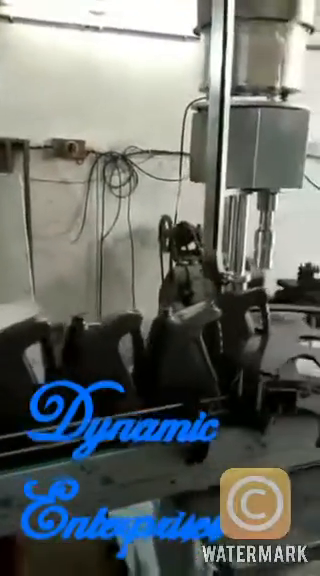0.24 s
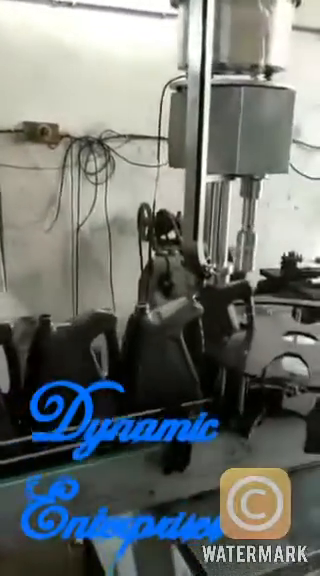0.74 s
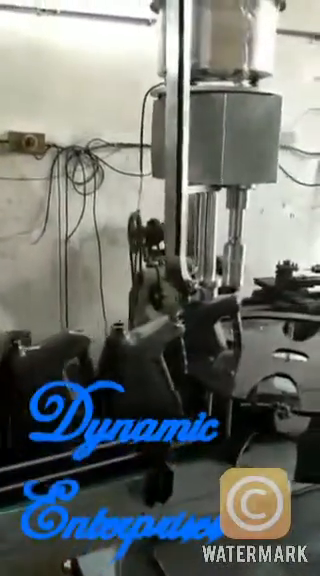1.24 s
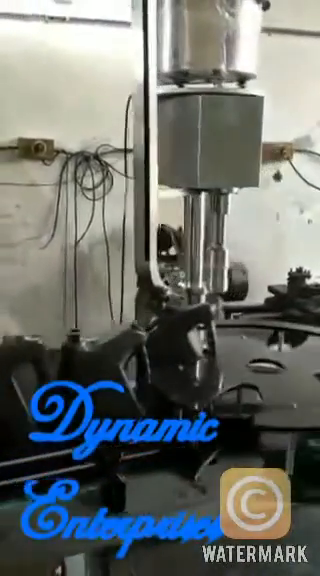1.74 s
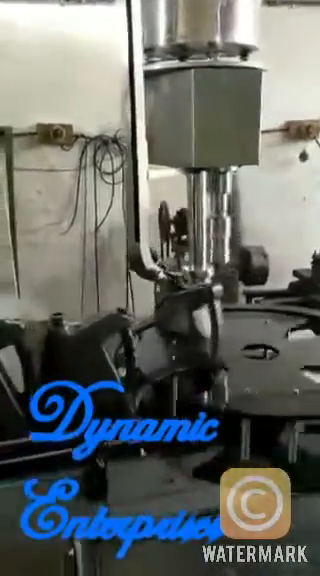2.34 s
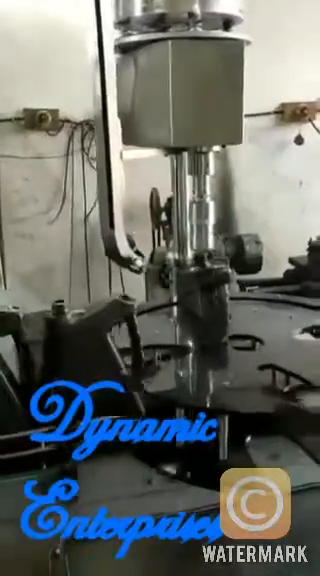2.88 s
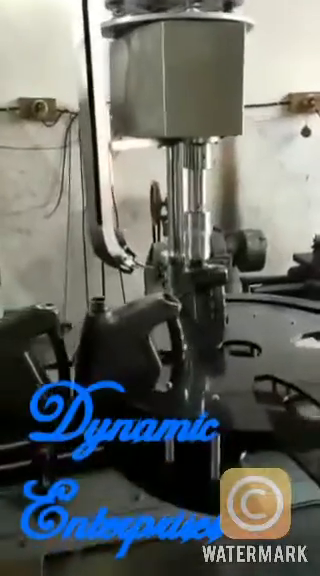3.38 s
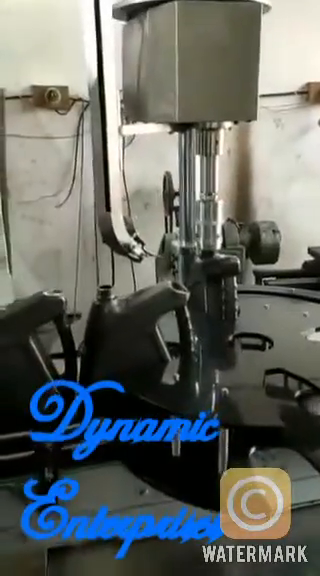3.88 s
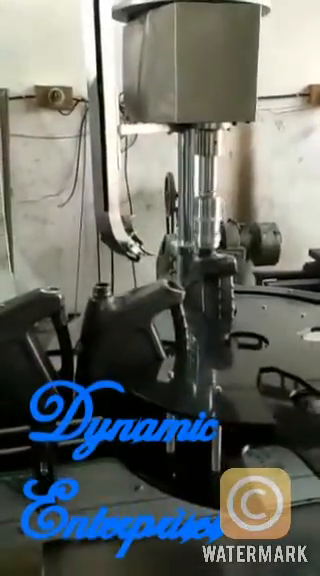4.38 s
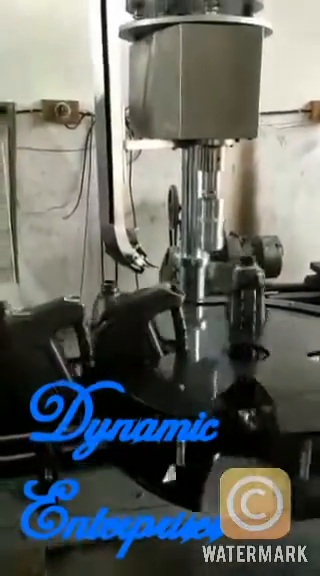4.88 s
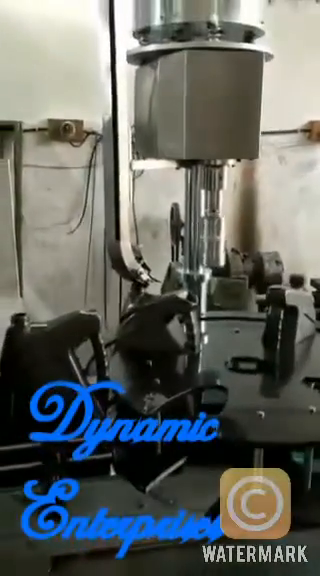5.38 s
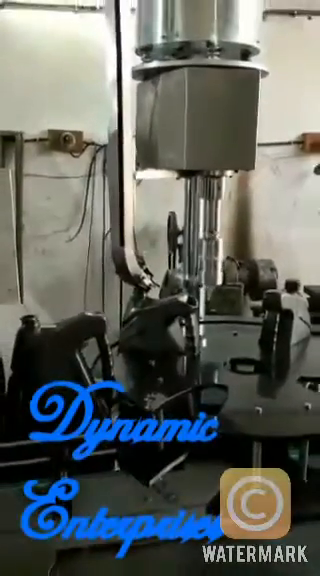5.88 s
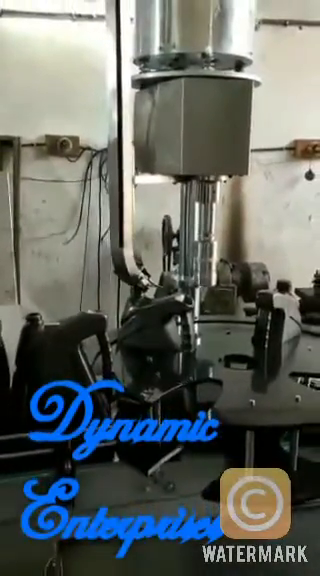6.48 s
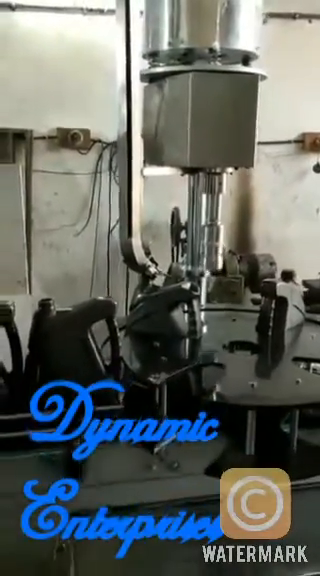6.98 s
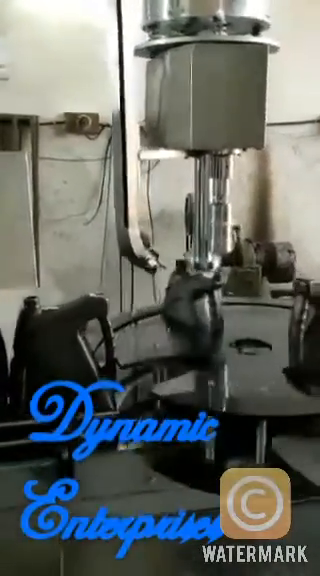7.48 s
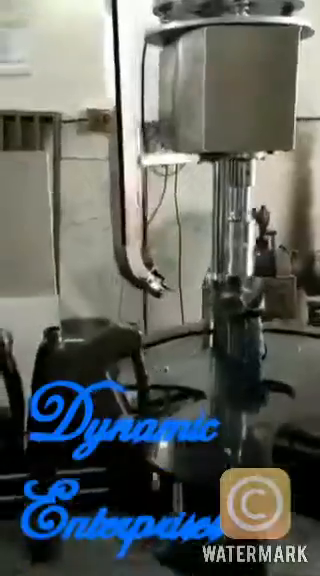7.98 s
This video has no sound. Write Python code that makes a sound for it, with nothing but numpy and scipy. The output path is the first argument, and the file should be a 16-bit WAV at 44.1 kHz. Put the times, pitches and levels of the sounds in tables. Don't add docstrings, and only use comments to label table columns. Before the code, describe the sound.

Throughout, a filling and capping machine gives a steady low roar with humming frame resonances, while thin whines around 4 and 8 kHz flicker in strength and side to side. Bottles scuff softly along rails. A click sounds at 0.9 s. At 2.1 s a soft air puff opens, then a short puff and a strong hiss from 2.3 s, with rapid dull valve knocks and faint hose whistles, fading by about 2.7. A tick lands at 3.1. From 3.6 to 4.7 s the capping clutch groans, rough and juddering with wavering tones, strongest near 4.2, with clicks around 4.3 and 4.7. Scuffs continue to 6. Tiny piercing squeaks chatter at 6.3-6.6. Clicks and puffs from 7.0 lead to another strong hiss at 7.4, fading after the roar dips and surges. A weak puff and last clicks end near 8.1. Close phone pickup, gritty treble, hard-walled workshop.

```python
import sys
import numpy as np
from scipy import signal
from scipy.io import wavfile
from scipy.ndimage import uniform_filter1d

SR = 44100
rng = np.random.default_rng(int(sys.argv[2]) if len(sys.argv) > 2 else 0)


def wav_out(sig):
    wavfile.write(sys.argv[1], SR, np.round(np.clip(np.atleast_2d(sig).T, -1, 1) * 32767).astype(np.int16))


def volts_from_db(level):
    exponent = np.asarray(level, float) / 20
    return 10 ** exponent


N = 363149


def evened(x):
    return x / np.sqrt(np.mean(x ** 2) + 1e-20)


def read(points, hz):
    f, value = np.transpose(points)
    return np.interp(np.log(hz + 1), np.log(f + 1), value)


def along(rows, off):
    s, value = np.transpose(rows)
    return uniform_filter1d(np.interp(np.arange(N) / SR, s, value, off, off), size=100)


def summed_db(levels_db):
    return 10 * np.log10((volts_from_db(levels_db) ** 2).sum(0) + 1e-12)


def panned(db):
    return volts_from_db(np.multiply.outer([.5, -.5], db))


def wander(rate, count):
    knots_per_s = 40
    knots = rng.standard_normal((count, int(N / SR * knots_per_s) + 2))
    knots = signal.lfilter([1], [1, -np.exp(-2 * np.pi * rate / knots_per_s)], knots)
    t = np.arange(N) * knots_per_s / SR
    return evened(np.array([np.interp(t, np.arange(len(k)), k) for k in knots]))


def resonate(x, hz, width):
    turn = np.exp(2j * np.pi * np.cumsum(hz * np.ones(x.shape[-1])) / SR)
    r = np.exp(-np.pi * width / SR)
    return 2 * (turn * signal.lfilter([1 - r], [1, -r], x / turn + 1e-18)).real


# f/Hz, likeness
SAME = [(30, .9), (130, .94), (290, .85), (640, .4), (1410, -.15), (3100, .1), (6820, -.05), (15000, 0)]
# f/Hz, left minus right/dB
LEAN = [(60, 4.2), (250, 5.5), (700, 2.3), (1300, 3.5), (2400, 2), (4400, 0), (7600, -3.5), (8500, 1.5),
        (10000, 2.5), (15000, 0)]


def noise(shape_db, patchy_db, size, band=None):
    hz = np.fft.rfftfreq(size, 1 / SR)
    a, b, c, d, patches = rng.standard_normal((N * 4 // size + 5, len(hz), 5)).T
    patches = uniform_filter1d(patches, size // 100, 0)
    patches = evened(uniform_filter1d(patches, 12000 // size, 1))
    same = np.clip(read(SAME, hz), -1, 1)[:, None]
    left = a + 1j * b
    right = same * left + np.sqrt(1 - same ** 2) * (c + 1j * d)
    z = np.array([left, right]) * panned(read(LEAN, hz))[:, :, None]
    z *= volts_from_db(shape_db(hz)[:, None] + patchy_db * patches)
    within = z[:, (hz > band[0]) & (hz < band[1])] if band else z
    share = np.sqrt((abs(within) ** 2).sum() / (abs(z) ** 2).sum())
    return evened(signal.istft(z, nperseg=size, noverlap=size * 3 // 4)[1][:, :N]) / share


# f/Hz, density/dB per Hz
ROAR = [(15, -28), (25, -11), (62, -14), (101, -7.5), (132, -12), (152, -7.5), (209, -1.5), (322, -2),
        (523, -9.5), (2850, -18.5), (3170, -23), (4150, -17.5), (4750, -25.5), (7850, -19), (8900, -20),
        (10400, -32.5), (15500, -37.5)]
# f/Hz, width/Hz, level/dB
FRAME = [(159.7, 8.5, 8.7), (205.4, 5.4, 7.9), (250, 31, 2.1), (280, 11, 1.9), (323, 7.6, 3.8),
         (452, 3.1, 5.1), (670, 30, 0.87)]
# t/s, low roar level change/dB
LOAD = [(0, 2.5), (.7, 0.5), (2.1, 0), (2.6, -1), (3, -0.5), (4.8, 1), (5.6, -0.5), (7.2, -1.5),
        (7.42, -4.5), (7.65, 3.5), (7.9, 0), (8.23, 0)]
ROAR_DB = -25


def roar():
    def shape_db(hz):
        return read(ROAR, hz) + sum(db / (1 + (2 * (hz - f) / w) ** 2) for f, w, db in FRAME)

    x = volts_from_db(ROAR_DB) * noise(shape_db, 1.0, size=4096)
    low = signal.sosfilt(signal.butter(1, 600, fs=SR, output="sos"), x)
    return x + low * (volts_from_db(along(LOAD, 0)) - 1)


CARRIER_HZ = [4000, 3760, 3844, 4157]
CARRIER_DB = [0.5, -12, -13.5, -10.5]
DOUBLE_HZ = [7919.5, 7681, 7760, 8000, 8079, 8239, 8320, 8477, 8823]
DOUBLE_DB = [-2, -9, -11, -13, -13, -8.5, -11.5, -15.5, -20]
# t/s, half width/s, level/dB, left minus right/dB, left phase lead/rad
CARRIER_CRESTS = [(0.12, 0.13, -48, 22, -2), (0.33, 0.1, -40.5, 2, 1), (0.71, 0.09, -47, 4, -0.5),
                  (1.02, 0.085, -47.5, -7, -3), (1.5, 0.078, -44, -3, -5.5), (1.9, 0.066, -45.5, 13, -5),
                  (2.11, 0.093, -48, -1, -8.5), (2.84, 0.13, -41, -3, -5), (3.2, 0.14, -50.5, 10, -8.5),
                  (3.58, 0.11, -49.5, 11, -8), (3.82, .06, -70, 7, -10), (4.17, 0.19, -45.5, 10, -11),
                  (4.5, 0.078, -47, 3, -11), (4.82, 0.092, -50, -4, -11), (5.25, 0.17, -45.5, 8, -9.5),
                  (5.93, 0.13, -40.5, 4, -11), (6.42, 0.32, -55, -3, -11.5), (7.07, 0.22, -56, 1, -14.5),
                  (7.83, 0.05, -43, -7, -17.5), (8.09, 0.075, -44, 3, -18)]
DOUBLE_CRESTS = [(0.37, 0.083, -38, -6, 4.5), (0.84, 0.076, -48, -11, 5), (1.16, 0.37, -43.5, -5, 4.5),
                 (1.81, 0.053, -38, -18, 9.5), (2.07, 0.04, -42, -7, 6), (2.56, 0.06, -54, -5, -3.5),
                 (2.85, 0.018, -33, -5, 8), (3.13, 0.13, -39, 7.5, 5.5), (3.52, 0.11, -40.5, 19, 5),
                 (4.23, 0.17, -82, -15, -2.5), (5.42, 0.091, -41.5, 10, -1), (5.93, 0.16, -35.5, 3, 3.5),
                 (6.31, 0.46, -47.5, -17, 5), (6.55, 0.042, -57, 8, -5.5), (6.76, 0.052, -48, 0, 0.5),
                 (7.09, 0.084, -35, -3, 2.3), (7.62, 0.06, -59, -1, -0.5), (7.9, 0.12, -47, -14, 14),
                 (7.94, 0.067, -48, 11, 7.5)]
CARRIER_TROUGH_DB, DOUBLE_TROUGH_DB = -50.5, -38
SIDE_FOLLOWS, SIDE_WANDER_RAD = .45, 1.6


def whine():
    t, out = np.arange(N) / SR, np.zeros((2, N))
    carrier = CARRIER_HZ, CARRIER_DB, CARRIER_CRESTS, CARRIER_TROUGH_DB
    double = DOUBLE_HZ, DOUBLE_DB, DOUBLE_CRESTS, DOUBLE_TROUGH_DB
    for pitches, lines_db, crests, trough_db in (carrier, double):
        s, width, crest_db, pan_db, ahead = np.transpose(crests)
        bumps = np.exp(-.5 * ((t[::100] - s[:, None]) / width[:, None]) ** 2)
        level = volts_from_db(trough_db) + (volts_from_db(crest_db) * panned(pan_db)) @ bumps
        level = uniform_filter1d(np.repeat(level, 100, axis=1)[:, :N], size=100)
        lead = np.interp(t, s, ahead)
        for k, (hz, db) in enumerate(zip(pitches, lines_db)):
            drift = wander(4.6, count=5)
            turn = 2 * np.pi * hz * t + 0.3 * drift[2]
            if k == 0:
                fade_db, heard = 1.4 * drift[:2], level
                turn = turn + np.array([lead, 0 * lead])
            else:
                fade_db = 3.5 * drift[:2]
                heard = SIDE_FOLLOWS * level + (1 - SIDE_FOLLOWS) * level.mean()
                smooth = 12000 if hz < 6000 else 1500
                turn = turn + SIDE_WANDER_RAD * uniform_filter1d(drift[3:], size=smooth)
            out += np.sqrt(2) * heard * volts_from_db(db + fade_db) * np.sin(turn)
    return out


# t of full flow/s, jet level/dB, opening/s, held open/s, hose level/dB
VENTS = [
    (2.126, -37, 0.085, .012, -26),
    (2.246, -36, 0.0056, 0.016, -30),
    (2.308, -27, 0.041, 0.23, -36),
    (7.172, -41, 0.0089, 0.011, -44),
    (7.214, -35, 0.049, 0.13, -23.5),
    (7.322, -38, 0.0066, 0.0035, -45),
    (7.374, -26.5, 0.033, 0.25, -29),
    (7.78, -42.5, 0.015, 0.061, -49),
]
# f/Hz, density/dB per Hz
JET = [(350, -71), (600, -2.5), (1300, -2), (2700, -6), (5000, -7.5), (7000, -2.5), (7800, 4), (8800, -2.5),
       (9600, -2.5), (10500, -46), (13000, -49)]
# f/Hz, density/dB per Hz
FIZZ = [(9000, -13), (10000, -3), (11200, -3.5), (13300, 2.5), (13900, 1), (14300, -9), (15600, -11),
        (16000, -42)]
# f/Hz, width/Hz, level/dB
HOSE = [(784, 150, -6), (1100, 64, -1.5), (1250, 76, -5.5)]
OPENING_DB, SAG_DB_PER_S, SHUT_DB_PER_S, SNAP_DB_PER_S = 12, 30.5, 65, 908
QUICK_S, LONG_S = .117, .2
FIZZ_DB, FIZZ_FOLLOWS = -8.5, 2.13
HOSE_WAIT_S, HOSE_GLIDE_S = 0.025, 0.048
HOSE_FOLLOWS, HOSE_THINS_DB = .55, -2.5


def vents():
    s, full_db, opening, held, ring_db = np.transpose(VENTS)[:, :, None]
    u = np.arange(0, N + 20, 20) / SR - s
    quick = np.diff(s, axis=0, append=99) < QUICK_S
    shut = np.where(quick, SNAP_DB_PER_S, SHUT_DB_PER_S) * np.maximum(u - held, 0)
    early = OPENING_DB * np.maximum(-u / opening, 0)
    flow_db = -early - SAG_DB_PER_S * np.maximum(u, 0) - shut
    risen = np.clip((u - HOSE_WAIT_S) / HOSE_GLIDE_S, 0, 1)
    rings_db = ring_db + HOSE_FOLLOWS * flow_db - early + HOSE_THINS_DB * risen
    with np.errstate(divide="ignore"):
        low_db = rings_db + 20 * np.log10(1 - risen)
        high_db = rings_db + 20 * np.log10(risen * (held > LONG_S))
    fizz_db = full_db + FIZZ_DB + FIZZ_FOLLOWS * flow_db + 0.38 * early
    rows = [summed_db(levels) for levels in (full_db + flow_db, fizz_db, low_db, high_db)]
    rows = uniform_filter1d(np.repeat(rows, 20, axis=1)[:, :N], size=100)
    jet_db, fizz_db, low_db, high_db = rows
    jet = volts_from_db(jet_db + 6.0) * noise(lambda hz: read(JET, hz), 2.5, size=256, band=(4500, 7400))
    fizz = volts_from_db(fizz_db + 11.5) * noise(lambda hz: read(FIZZ, hz), 2.2, size=256)
    air = rng.standard_normal((2, N))
    low, *high = (volts_from_db(db) * evened(resonate(resonate(air, hz, w), hz, 2 * w)) for hz, w, db in HOSE)
    return jet + fizz + volts_from_db(low_db) * low + volts_from_db(high_db) * sum(high)


# t/s, peak level/dB, f/Hz
THUMPS = [(2.247, -15.5, 765), (2.290, -19, 773), (2.308, -16, 790), (2.330, -18.5, 810),
          (2.346, -17.5, 770), (2.402, -22, 720), (7.232, -28, 770), (7.370, -20, 780), (7.391, -18, 790),
          (7.414, -23, 800), (7.464, -23, 1110)]
THUMP_RISE_S, THUMP_T60_S = .004, .055
THUMP_UPPER, THUMP_UPPER_DB = 1.22, -8


def thumps():
    out, t = np.zeros((2, N + SR)), np.arange(4000) / SR
    for s, db, hz in THUMPS:
        upper = volts_from_db(THUMP_UPPER_DB) * np.sin(2 * np.pi * THUMP_UPPER * hz * t)
        ring = np.sin(2 * np.pi * hz * t) + upper
        decay_db = -60 * np.maximum(t - THUMP_RISE_S, 0) / THUMP_T60_S
        ring *= np.minimum(t / THUMP_RISE_S, 1) * volts_from_db(db + decay_db)
        out[:, round(s * SR):][:, :len(t)] += panned(3.3)[:, None] * [ring, np.roll(ring, 6)]
    return out[:, :N]


# t/s, grip level/dB
GROAN = [
    (3.56, -43),
    (3.608, -19),
    (3.87, -20.5),
    (4.0, -15.5),
    (4.11, -16),
    (4.21, -14.5),
    (4.394, -17),
    (4.5, -21),
    (4.588, -27),
    (4.66, -24),
]
# f/Hz, width/Hz, level/dB
HEAD_LOW = [(84, 41, -20), (166.7, 33, -5.5), (253, 34, -1.5), (279, 10.6, -3.5), (363.5, 41, -1),
            (426, 46, -6.5), (568, 66, -7), (656, 78, -6.5), (708, 51, -15.5), (1010, 45, -13),
            (1074, 62, -12), (1286, 130, -20)]
# f/Hz, width/Hz, level/dB
HEAD_HIGH = [(1430, 360, 11), (1577, 190, 9), (1640, 38, -11), (1816, 45, -7)]
SLIPS_PER_S = 75
UPPER_DB, UPPER_FADE_DB_PER_S = -13.5, 1.5


def groan():
    span, out = slice(round(3.4 * SR), round(4.85 * SR)), np.zeros((2, N))
    grip_db, t = along(GROAN, off=-90)[span], np.arange(N)[span] / SR
    upper_db = UPPER_DB - UPPER_FADE_DB_PER_S * (t - GROAN[1][0])
    turns = np.cumsum(SLIPS_PER_S * (1 + .12 * wander(6.0, count=1)[0][span])) / SR
    size, *rub = rng.standard_normal((len(turns), 4)).T
    slips = (np.diff(turns // 1, prepend=0) > 0) * volts_from_db(3.0 * size)
    drive = .55 * evened(slips) + .55 * rub[0] + .42 * np.array(rub[1:])
    low, high = (evened(sum(volts_from_db(db) * resonate(resonate(drive, f, w), f, 1.9 * w) / np.sqrt(w)
                            for f, w, db in body))
                 for body in (HEAD_LOW, HEAD_HIGH))
    high[1] = 0.71 * np.roll(high[1], 900) - 0.11 * high[0]
    body = volts_from_db(-1.0) * low * panned(6.2)[:, None] + volts_from_db(upper_db + 6.0) * high
    out[:, span] = volts_from_db(grip_db - 2.0) * body
    return out


# start t/s, length/s, first f/Hz, settled f/Hz, level/dB
SINGS = [(3.6, 0.04, 355, 364, -29), (3.722, 0.17, 278, 281.5, -29.5), (3.804, 0.069, 222, 220, -28),
         (3.9, 0.07, 195, 195, -24.5), (3.99, 0.355, 191, 191.5, -21.5), (4.017, 0.12, 251, 250, -30),
         (4.162, 0.31, 284, 280, -22.5), (4.159, 0.19, 294.6, 370, -27), (4.332, 0.073, 352, 334, -28),
         (3.6, 0.15, 1584, 1640, -36), (3.91, 0.103, 371, 350, -31), (3.996, .12, 1660, 1627, -29),
         (4.132, 0.19, 1670, 1620, -27.5)]
# start t/s, length/s, first f/Hz, settled f/Hz, level/dB
WHISTLES = [
    (2.33, .17, 1180, 1245, -33),
    (2.43, .07, 1110, 1095, -34),
    (7.39, .07, 1010, 1000, -36),
    (7.455, .14, 1220, 1240, -31),
    (7.46, .05, 1120, 1100, -32.5),
    (7.535, .07, 1095, 1105, -33.5),
    (7.595, .09, 1210, 1225, -36),
]
SETTLE_S, SING_WOBBLE_DB = .04, 1.5


def sings():
    out, tones = np.zeros(N), SINGS + WHISTLES
    sways = rng.standard_normal((len(tones), 2, 20000))
    for (s, length, first_hz, hz, db), sway in zip(tones, sways):
        u = np.arange(round(length * SR)) / SR
        sway = uniform_filter1d(uniform_filter1d(sway, size=600), size=600)
        sway = evened(sway)[:, :len(u)]
        pitch = (hz + (first_hz - hz) * np.exp(-u / SETTLE_S)) * (1 + 0.0062 * sway[0])
        tone = np.sin(2 * np.pi * np.cumsum(pitch) / SR) * signal.windows.tukey(len(u), .35)
        out[round(s * SR):][:len(u)] += 1.6 * volts_from_db(db + SING_WOBBLE_DB * sway[1]) * tone
    return np.array([1.3 * out, .7 * np.roll(out, 10)])


# t/s, peak level/dB, ring f/Hz, relative knock level/dB, left minus right/dB
CLICKS = [(0.889, -23, 7800, -29, 6), (2.1263, -20.5, 8160, -18, -11), (2.243, -15, 7840, -7.5, 4),
          (3.061, -22, 8000, -29, -12), (4.319, -17.5, 7450, -20, -8), (4.3305, -19, 7800, -19, -3),
          (4.2736, -21, 7720, -10, -12), (4.694, -23, 8200, -25, -5), (7.013, -26.5, 8260, -16, 14),
          (7.1686, -20, 7930, -25, -8), (7.3196, -16.5, 8470, -21, 2), (7.96, -30, 8400, -14, 1),
          (8.1353, -21, 8060, -32, -2)]
# t/s, peak level/dB, f/Hz, length/s, left
# minus right/dB
SQUEAKS = [(6.332, -15, 7930, .018, -4), (6.337, -22, 7930, .006, -4), (6.3525, -20, 8000, .0085, -4),
           (6.36, -16.5, 7920, .013, -6), (6.372, -18, 8000, .007, -5), (6.379, -21, 7900, .004, -5),
           (6.384, -23, 7920, .017, -5), (6.406, -19, 7930, .0045, -5), (6.41, -19, 8050, .0045, -5),
           (6.426, -21, 7920, .006, -6), (6.433, -22, 7950, .01, -6), (6.492, -24, 7920, .028, -3),
           (6.598, -22.5, 7830, .007, -3), (7.968, -32, 2040, .022, 0), (8.004, -31.5, 2010, .045, 0),
           (7.57, -26, 500, .04, 3)]
RING_T60_S, RING_WIDTH_HZ = .018, 800
CRACK, CRACK_T60_S = 0.077, 0.045


def clicks():
    out, t = np.zeros((2, N + SR)), np.arange(3000) / SR
    grits = rng.standard_normal((len(CLICKS), 2, 2, 3000))
    for (s, db, hz, knock_db, pan_db), grit in zip(CLICKS, grits):
        rough = evened(resonate(resonate(grit[0], hz, RING_WIDTH_HZ), hz, RING_WIDTH_HZ))
        ring = .2 * np.sin(2 * np.pi * hz * t) + .5 * rough
        crack = CRACK * grit[1] * volts_from_db(-60 * t / CRACK_T60_S)
        knock = evened(resonate(resonate(grit[1], 1300, 2700), 1300, 2700))
        knock = knock * volts_from_db(knock_db - 9.5 - 60 * t / 0.097)
        onset = np.sin(np.pi / 2 * np.minimum(t / .0025, 1)) ** 2
        tick = (ring * volts_from_db(-60 * t / RING_T60_S) + crack + knock) * onset
        out[:, round(s * SR):][:, :len(t)] += volts_from_db(db + 14.5) * panned(pan_db)[:, None] * tick
    for s, db, hz, length, pan_db in SQUEAKS:
        u = np.arange(round(length * SR)) / SR
        tone = np.sin(2 * np.pi * hz * u + np.array([[0], [.8]])) * signal.windows.tukey(len(u), .5)
        out[:, round(s * SR):][:, :len(u)] += volts_from_db(db - 0.5) * panned(pan_db)[:, None] * tone
    return out[:, :N]


# t/s, peak level/dB, swelling/s, fading/s
SCUFFS = [(0, -36.5, .02, 0.32), (.7, -42, 0.19, 0.38), (.89, -49.5, 0.015, 0.2), (1.07, -44.5, 0.04, 0.81),
          (1.66, -46, 0.25, 0.45), (2.04, -52, 0.14, 0.044), (2.8, -41, 0.15, 0.12),
          (3.06, -34.5, 0.091, 0.095), (3.37, -40.5, 0.038, 0.17), (3.62, -37, 0.037, 0.2),
          (3.95, -38.5, 0.23, 0.16), (4.24, -32.5, 0.16, 0.057), (4.32, -28.5, 0.013, 0.22),
          (4.7, -38.5, .03, 0.058), (5.06, -32, 0.078, 0.23), (5.63, -39, 0.015, 0.1),
          (6, -36, 0.14, 0.017), (6.42, -54, 0.27, 0.096), (6.68, -47, 0.053, 0.15),
          (6.93, -42, 0.03, 0.53), (7.961, -35, 0.0079, 0.11), (8.14, -37, 0.015, 0.3)]
# f/Hz, density/dB per Hz
SCUFF = [(590, -14), (1000, -8), (2210, -19.5), (3040, -10), (4120, -25), (4510, -16.5), (7770, -8),
         (10400, -21), (11400, -23), (15000, -35)]
RUB_DB, SCUFF_SWING_DB = -42.5, 13.5


def scuffs():
    s, peak_db, swell, fade = np.transpose(SCUFFS)[:, :, None]
    u = np.arange(0, N + 20, 20) / SR - s
    scuff_db = peak_db - SCUFF_SWING_DB * np.maximum(-u / swell, u / fade)
    level = volts_from_db(summed_db(scuff_db)) + volts_from_db(RUB_DB)
    grain = volts_from_db(2.0 * uniform_filter1d(rng.standard_normal(N), 150) * np.sqrt(150))
    rub = noise(lambda hz: read(SCUFF, hz), 3.0, size=256, band=(5000, 7500))
    return np.repeat(level, 20)[:N] * rub * evened(grain)


# f/Hz, t60/s
SHOP = [(300, 0.43), (1000, 0.32), (4000, 0.91), (10000, 0.38)]


def shop(x):
    hz, t, z = signal.stft(rng.standard_normal((2, SR)), SR, nperseg=256)
    z = z * (t > .008) * volts_from_db(-60 * t / read(SHOP, hz)[:, None])
    tail = signal.istft(z, SR, nperseg=256)[1]
    return signal.fftconvolve(x, tail / np.linalg.norm(tail[0]), axes=1)[:, :N]


def scene():
    ticks = clicks()
    machine = roar() + whine() + vents() + scuffs() + groan() + sings() + thumps()
    return machine + ticks + volts_from_db(-4) * shop(ticks)


# f/Hz, level against the usual bin/dB
DROPPED = [(2300, -20), (3300, -1), (3900, -4), (4700, 0), (5800, -6), (7000, -16), (8400, -13), (9100, 5),
           (10800, 9), (12500, 7.5), (14100, 5.5), (14800, 10), (15500, 12)]
# f/Hz, threshold rise/dB per dB
MASKED = [(2500, 0), (4500, .08), (8200, 0), (9000, .6), (10800, .8), (12300, .2), (13650, .1),
          (13850, 1.0), (15500, 1.0)]
# t/s, level/dB
TIGHT = [(0, 0.5), (2.0, -2), (2.1, -6.5), (2.3, -4), (2.36, -6), (2.6, 0.5), (2.7, -2), (3.0, 0.5),
         (3.1, -9.5), (3.4, 0), (4.1, 0), (4.25, -1.5), (4.45, -1), (4.52, 2), (5.0, 3), (5.2, -1),
         (5.7, -1), (5.9, 4.5), (6.28, -1), (6.33, 4.5), (6.5, 4), (6.56, -1.5), (7.1, -0.5), (7.17, -1),
         (7.38, -18), (7.46, 0), (8.23, 0)]
FULL_LINGERS = 0.6


def mask_weak(x):
    frame = dict(fs=SR, window="cosine", nperseg=2048, noverlap=1024)
    shift = 361
    hz, t, z = signal.stft(np.pad([x[0] + x[1], x[0] - x[1]], ((0, 0), (shift, 0))), **frame)
    level_db = 10 * np.log10(uniform_filter1d((abs(z) ** 2).mean(0), 25, 0) + 1e-14)
    usual_db = np.median(level_db, 1, keepdims=True)
    rise_db = level_db - usual_db
    peak_db = rise_db[(hz > 7600) & (hz < 8200)].max(0)
    luck = rng.standard_normal((z.shape[2], len(hz) // 16 + 2)).T
    luck = luck + .7 * np.roll(luck, 1, 1)
    jump_db = 1.1 * luck[-1] + 3.5 * luck[np.arange(len(hz)) // 16]
    attack_db = np.diff(level_db[hz > 10000].mean(0), prepend=99)
    relief = signal.lfilter([1], [1, -FULL_LINGERS], np.clip(attack_db - 6.5, 0, 9))
    jump_db = jump_db - 2.2 * relief
    treble = np.clip((hz[:, None] - 8300) / 1500, 0, 1)
    jump_db = jump_db + treble * np.interp(t, *np.transpose(TIGHT))
    masked_db = read(DROPPED, hz)[:, None] + read(MASKED, hz)[:, None] * peak_db
    limit = volts_from_db(usual_db + .5 * rise_db + masked_db + jump_db)
    mid, side = signal.istft(z * (abs(z) > limit), **frame)[1][:, shift:][:, :N]
    return np.array([mid + side, mid - side]) / 2


# t/s, length/s, level/dB
STARVED = [
    (7.311, .0075, -10),
    (7.327, .018, -7),
    (6.3495, .0035, -16),
]


def starve_treble(x):
    t = np.arange(N) / SR
    dip_db = sum(db * ((t > s) & (t < s + length)) for s, length, db in STARVED)
    dip_db = uniform_filter1d(dip_db, size=40)
    treble = signal.sosfiltfilt(signal.butter(2, 2500, "high", fs=SR, output="sos"), x)
    edge = signal.ellip(10, .2, 50, 15740, fs=SR, output="sos")
    return signal.sosfiltfilt(edge, x + treble * (volts_from_db(dip_db) - 1))


def low_pass(x):
    return signal.sosfilt(signal.butter(12, 15830, fs=SR, output="sos"), x)


def record(dry):
    bright = signal.sosfilt(signal.butter(2, 1500, "high", fs=SR, output="sos"), dry)
    power_db = 10 * np.log10(uniform_filter1d((bright ** 2).mean(0), 2000) + 1e-12)
    fall = np.arange(N) * 25.0 / SR
    held_db = np.maximum.accumulate(power_db + fall) - fall
    over_db = np.maximum(held_db + 21.0, 0)
    ducked = dry / volts_from_db(0.35 * uniform_filter1d(over_db, 800))
    return low_pass(starve_treble(mask_weak(ducked)))


dry = scene()
out = record(dry)
wav_out(out)
```